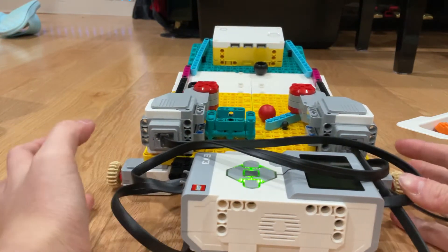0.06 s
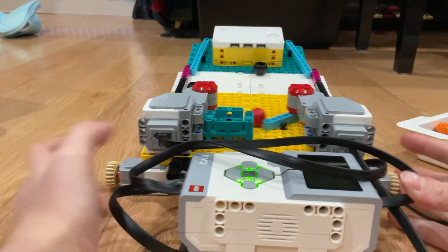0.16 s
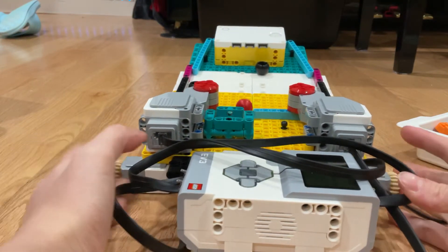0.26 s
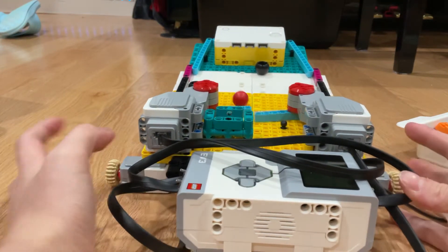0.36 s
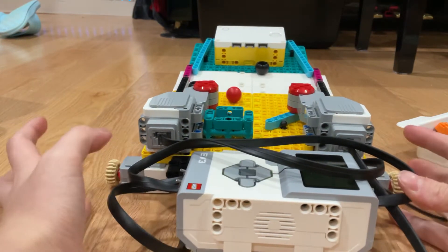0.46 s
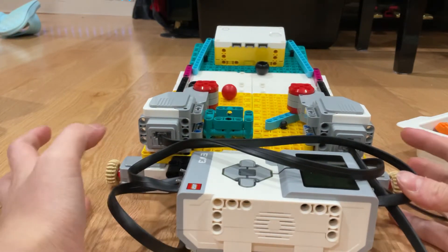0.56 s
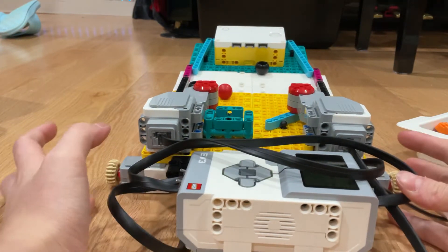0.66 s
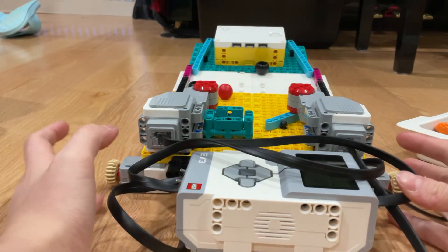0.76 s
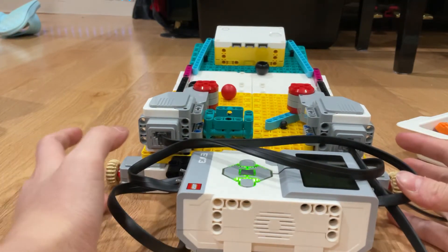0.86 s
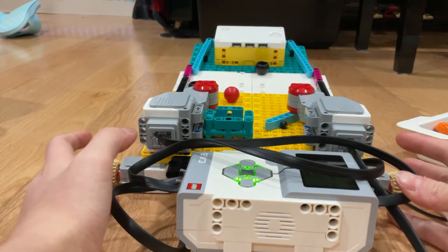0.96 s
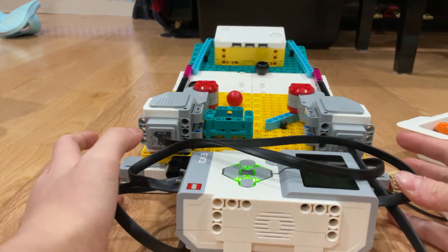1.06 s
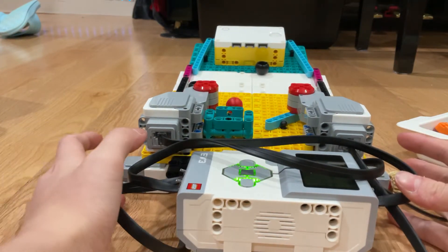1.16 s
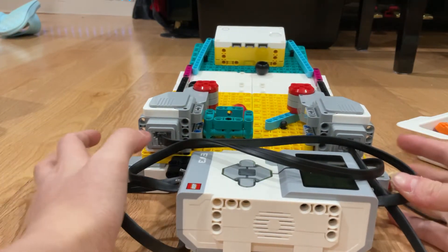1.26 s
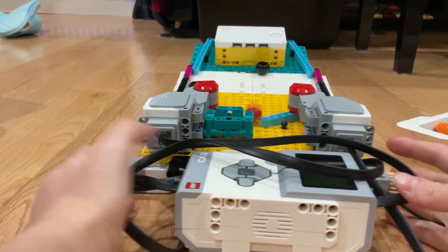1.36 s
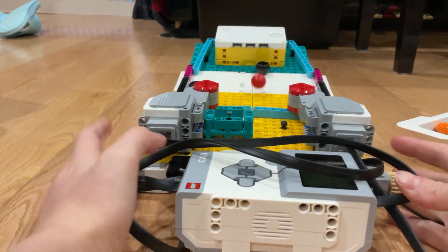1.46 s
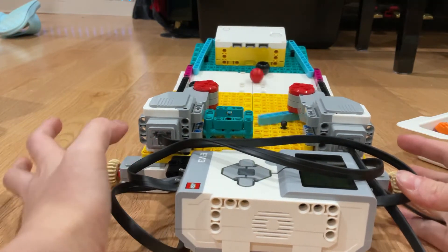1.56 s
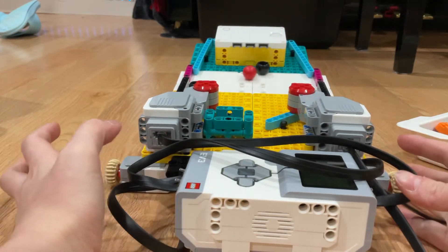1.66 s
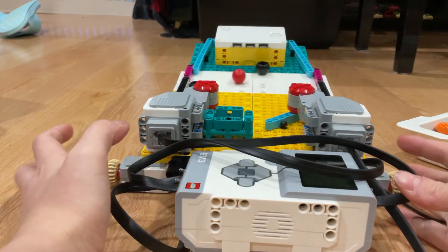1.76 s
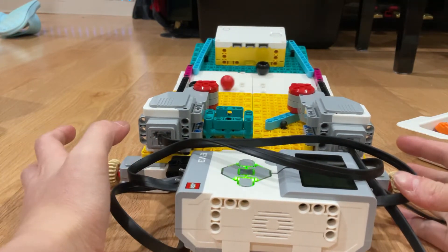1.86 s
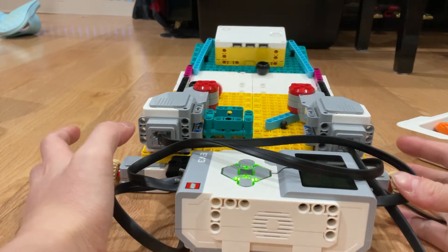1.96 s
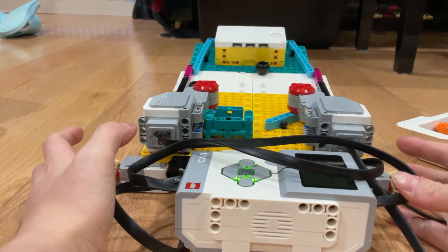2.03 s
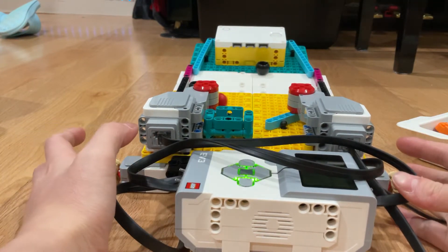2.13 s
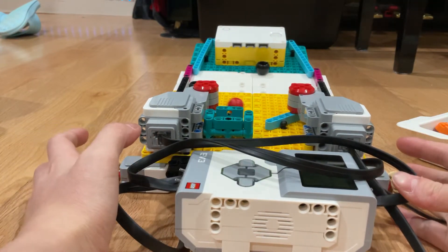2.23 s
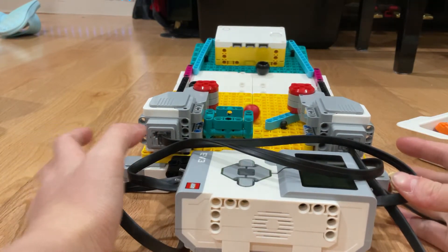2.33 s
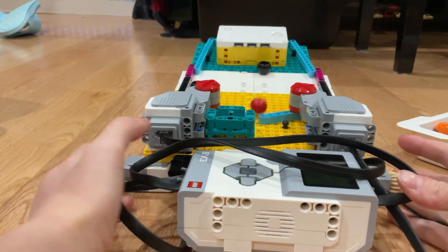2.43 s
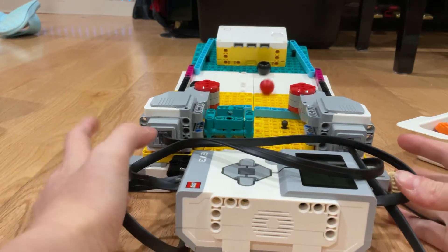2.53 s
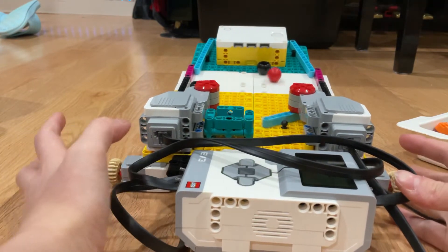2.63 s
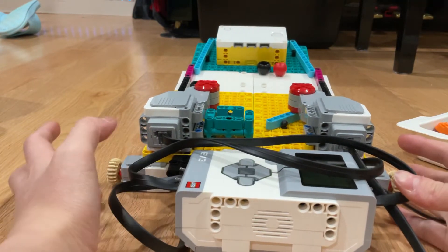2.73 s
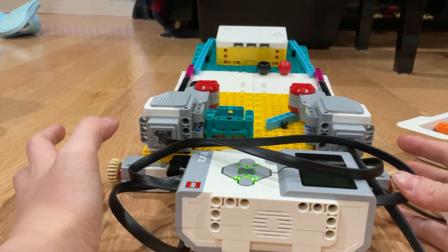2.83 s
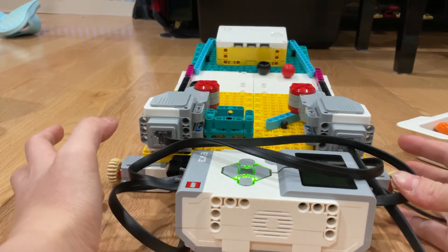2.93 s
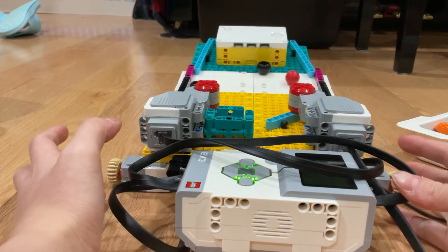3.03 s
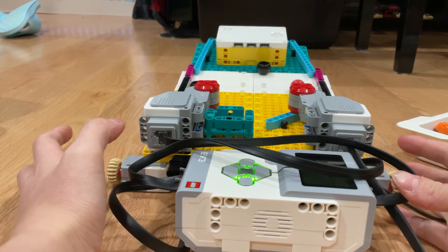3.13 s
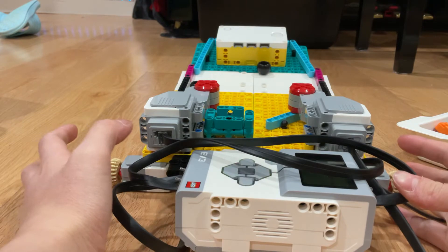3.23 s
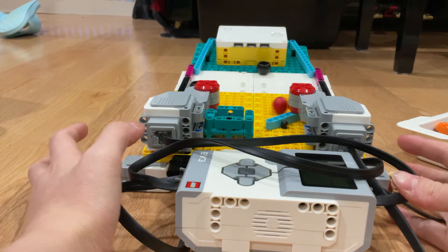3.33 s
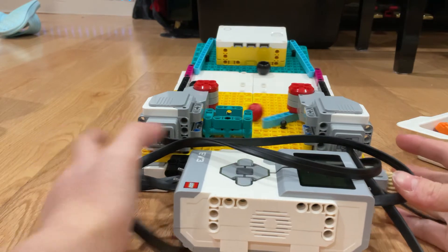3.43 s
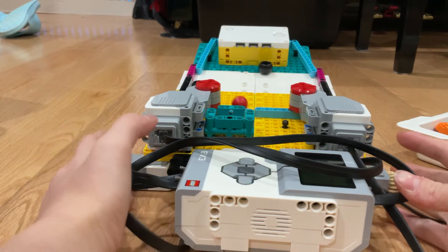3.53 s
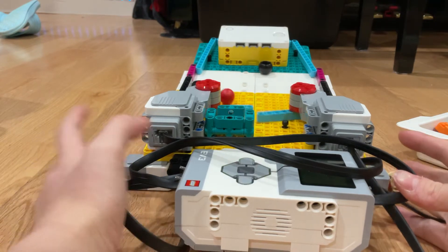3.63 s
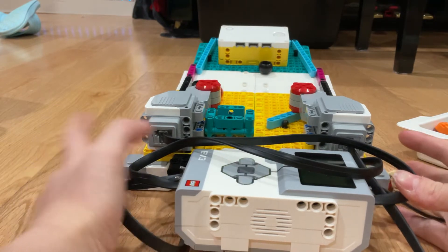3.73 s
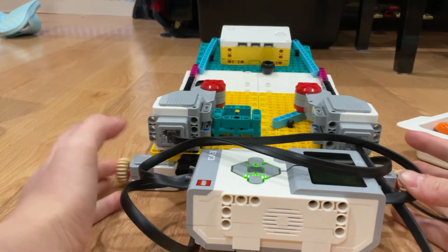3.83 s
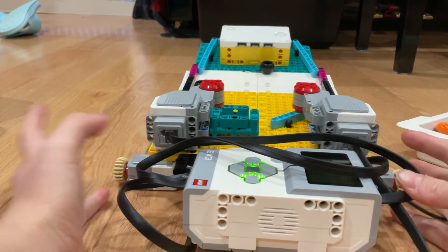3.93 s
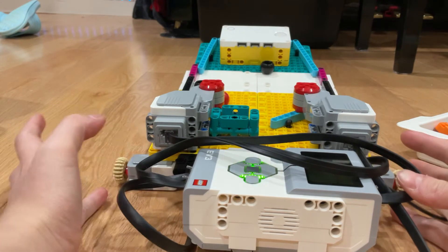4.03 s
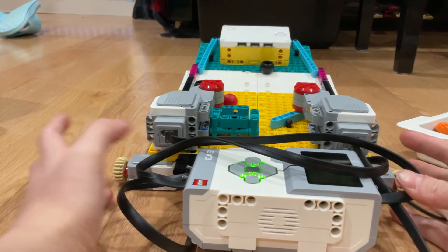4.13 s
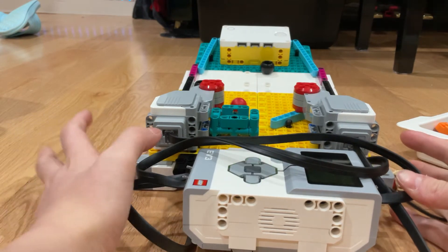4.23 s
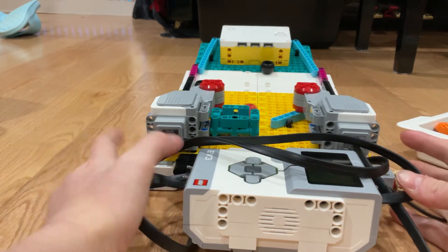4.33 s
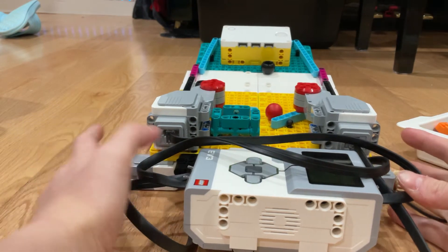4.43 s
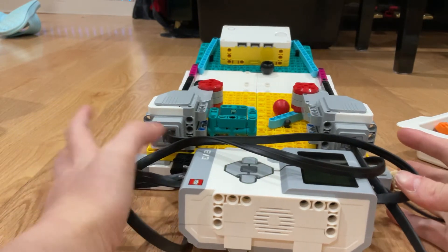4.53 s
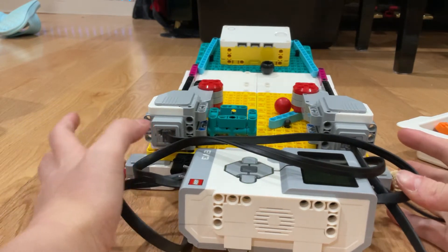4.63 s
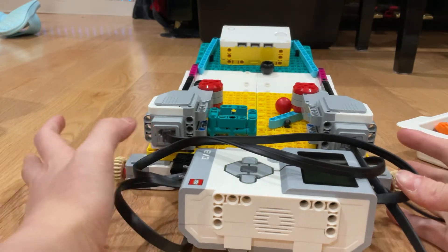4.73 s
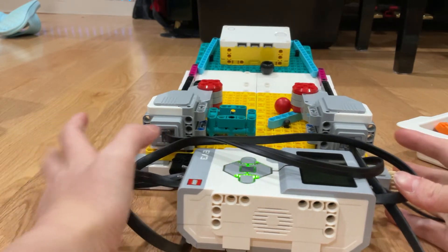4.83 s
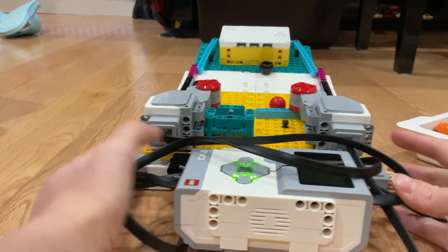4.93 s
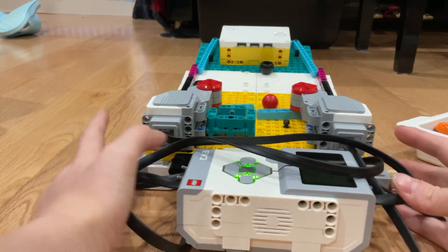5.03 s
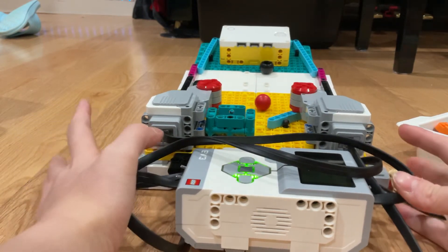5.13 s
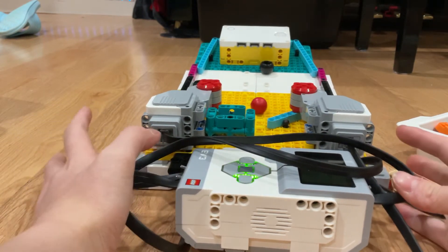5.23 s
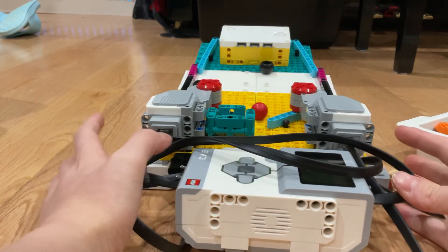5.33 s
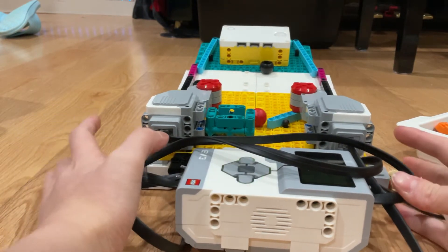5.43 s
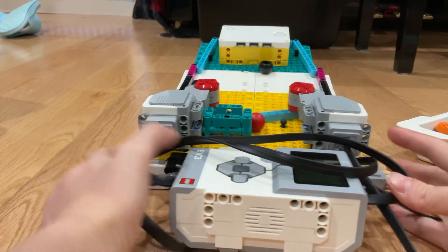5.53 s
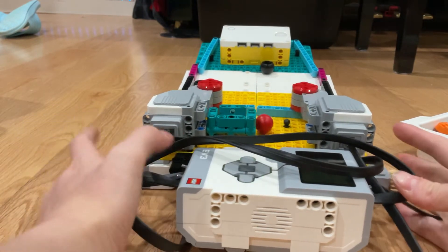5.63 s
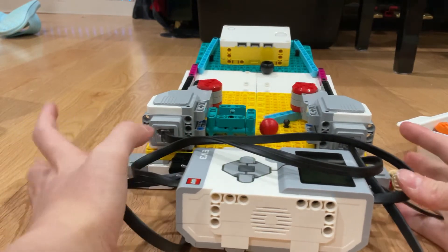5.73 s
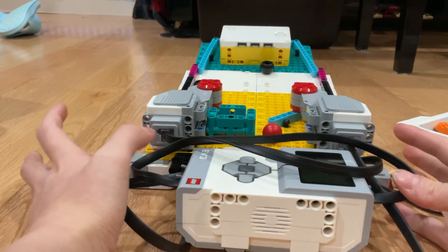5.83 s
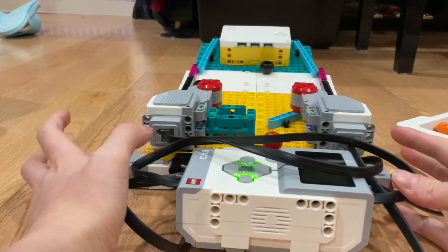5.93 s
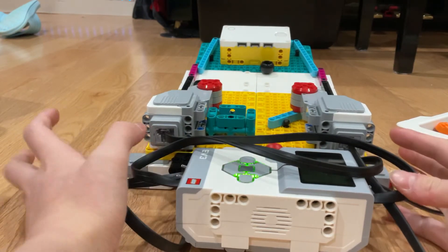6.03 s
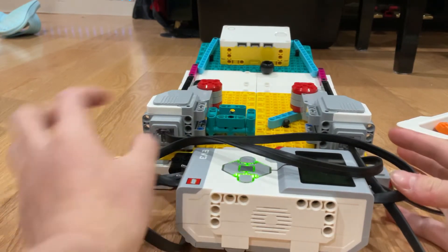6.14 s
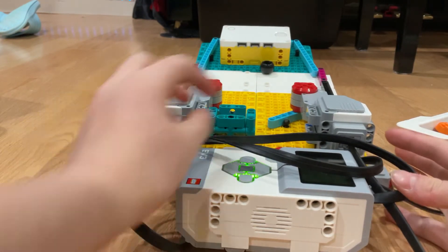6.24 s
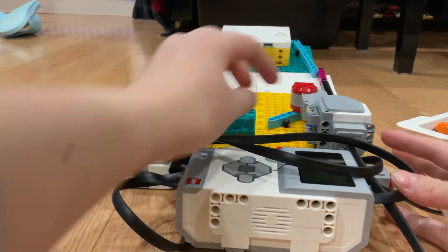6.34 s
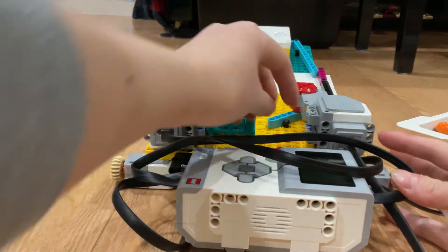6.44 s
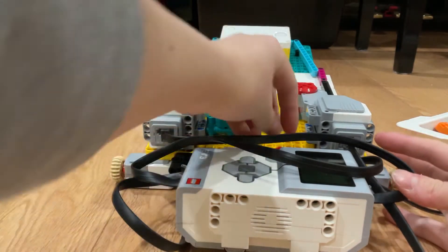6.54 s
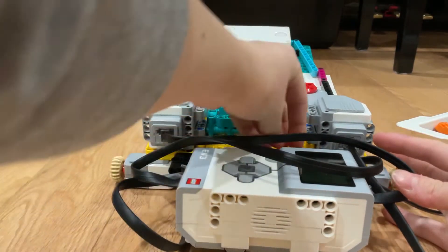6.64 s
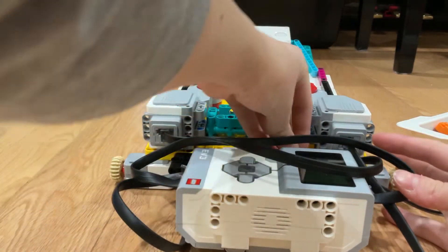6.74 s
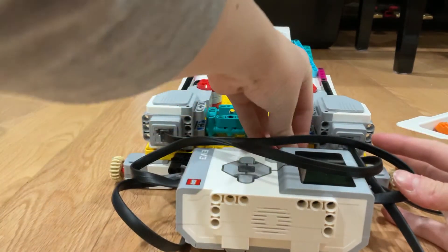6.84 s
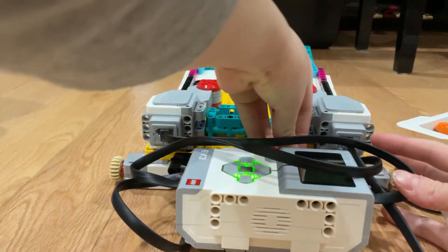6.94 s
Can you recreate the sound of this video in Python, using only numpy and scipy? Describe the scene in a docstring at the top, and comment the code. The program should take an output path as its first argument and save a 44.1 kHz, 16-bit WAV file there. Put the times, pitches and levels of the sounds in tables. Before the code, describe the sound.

Short geared-motor zips and hard plastic flipper cracks punctuate the rumble and ticking of a small ball on a hollow brick board, close up.

```python
"""A toy pinball machine of plastic bricks is played on a wooden floor, close to the microphone.
From the start a light ball rumbles over the studs (random bumps) and knocks on the bricks (fading noise
and ringing notes). Seven times a geared motor whirrs out and back (noise from many tiny tooth contacts);
eight times a flipper slams against its stop, with a crack, a ringing beam and a low thump.
After strokes come a thin whine and, at times, a double tick; near the end a sleeve and hand brush by."""
import sys
import numpy as np
from scipy import signal
from scipy.fft import rfft, irfft
from scipy.io import wavfile
from scipy.ndimage import uniform_filter1d

SR = 44100
rng = np.random.default_rng(int(sys.argv[2]) if len(sys.argv) > 2 else 0)


def dump_mix(stems):
    """Bounce the given channels to the path in sys.argv[1] as a 16-bit WAV at rate SR."""
    frames = np.atleast_2d(stems).T  # one column per channel
    limited = np.clip(frames, -1, 1)  # hard clip at full scale
    pcm = np.round(limited * 32767).astype(np.int16)
    wavfile.write(sys.argv[1], SR, pcm)


N = 307818
TIME = np.arange(N) / SR
# Levels in the tables are those before the trims in each function and in scene().


def amp(db):
    """Turns decibels into a gain."""
    return 10 ** (np.asarray(db) / 20)


def unit_rms(x):
    """Scales a sound to a mean power of one."""
    return x / np.sqrt(np.mean(x ** 2) + 1e-20)


def read(points, hz):
    """Reads a spectrum of (Hz, value) points, joined by lines on a logarithmic frequency axis."""
    point_hz, value = np.transpose(points)
    return np.interp(np.log(hz + 1), np.log(point_hz + 1), value)


def add(mix, s, sound):
    """Adds a sound into the mix at time s."""
    part = mix[max(0, round(s * SR)):][:len(sound)]
    part += sound[:len(part)]


def colour(x, db_at):
    """Filters x with gain db_at(Hz); the filter never sounds before its input."""
    size = 4096
    hz = abs(np.fft.fftfreq(size, 1 / SR))
    # minimum phase: the phase follows from the logarithm of the gain
    response = np.exp(np.conj(signal.hilbert(np.log(amp(db_at(hz))))))
    kernel = np.fft.ifft(response).real[:size // 2]
    return signal.oaconvolve(x, kernel)[:len(x)]


def die_away(x, t60_at, delay=0):
    """Lets each octave of x fade by 60 dB in its own t60_at(Hz) seconds, after a delay."""
    hz = np.fft.rfftfreq(len(x), 1 / SR)
    t = np.maximum(np.arange(len(x)) / SR - delay, 0)
    centres = np.geomspace(125, 16000, 8)
    out = 0
    for centre in centres:
        share = read(np.c_[centres, centres == centre], hz)  # one at this centre, zero at the others
        out = out + irfft(rfft(x) * share, len(x)) * amp(-60 * t / t60_at(centre))
    return out


def strength(x, low_hz=800, high_hz=7000):
    """Rms that a short sound has in a band when its energy is spread over 10 ms."""
    hz = np.fft.rfftfreq(len(x), 1 / SR)
    in_band = (hz > low_hz) & (hz < high_hz)
    energy = 2 * np.sum(abs(rfft(x)[in_band]) ** 2) / len(x)
    return np.sqrt(energy / (SR / 100) + 1e-20)


def brighten(x, treble_db):
    """Shifts the treble towards treble_db against the middle: hard contacts are bright, soft ones dull."""
    shelf_db = treble_db - 20 * np.log10(strength(x, 8000, 16000) / strength(x))
    x = colour(x, lambda hz: read([(5000, 0.011), (9000, shelf_db)], hz))
    return x / strength(x)


def ring(modes, count, detune=0.):
    """Sums fading notes (Hz, level dB, t60 s), each mistuned by chance by the fraction detune."""
    t = np.arange(count) / SR
    out = 0
    for hz, db, t60 in modes:
        tuned_hz = hz * (1 + detune * rng.standard_normal())
        out = out + amp(db - 60 * t / t60) * np.sin(2 * np.pi * tuned_hz * t)
    return out


def patter(per_s, spread_db):
    """Random tiny impacts of uneven size, per_s of them a second on average."""
    size = amp(spread_db * np.minimum(rng.exponential(1, N), 3.5))
    happens = rng.random(N) < per_s / SR
    return unit_rms(size * rng.standard_normal(N) * happens)


def peaks(hz, centres, width_hz):
    """Bumps of height one at the given frequencies."""
    distance = 2 * (hz[:, None] - np.asarray(centres)) / width_hz
    return np.max(1 / (1 + distance ** 2), axis=1)


def spot(hz, depth_db=1.0):
    """Each spot on the bricks favours its own chance set of resonances (gain in dB)."""
    grid = np.geomspace(300, 17000, 70)
    return depth_db * np.interp(hz, grid, rng.uniform(-1.7, 1.7, len(grid)))


def mottle(x, depth_db, patch_frames, patch_bins):
    """Lets patches of the spectrum swell and fade by chance."""
    z = signal.stft(x, nperseg=512, noverlap=384)[2]
    patches = rng.standard_normal(z.shape)
    patches = uniform_filter1d(patches, max(1, round(patch_bins)), 0)
    patches = uniform_filter1d(patches, max(1, round(patch_frames)), 1)
    return signal.istft(z * amp(depth_db * unit_rms(patches)), nperseg=512, noverlap=384)[1][:N]


# tone of the background: (frequency [Hz], gain [dB])
FLOOR_TONE = [(25, -15), (85, 2), (200, -3), (1600, -11), (9500, -21.5), (13300, -26.5)]


def floor(level_db=-77):
    """Quiet background of the room and the microphone: steady coloured noise."""
    return amp(level_db) * unit_rms(colour(rng.standard_normal(N), lambda hz: read(FLOOR_TONE, hz)))


# runs of the ball over the playfield: (time at full speed [s], length [s], level [dB])
BALL_RUNS = [(0, 0.19, -57.5), (0.275, .15, -45), (0.994, 0.42, -60.5), (1.475, 0.068, -42),
             (1.71, .05, -49), (1.867, .21, -47), (2.229, .1, -52), (2.43, 0.17, -38.5),
             (3.102, 0.73, -46.5), (4.16, 0.079, -65.5), (4.34, 0.13, -44), (4.723, 0.023, -58.5),
             (4.978, 0.2, -45), (5.33, 0.15, -51.5), (5.624, 0.16, -50), (5.98, .07, -56)]
# the rumble swells as the ball gathers speed and fades as it slows
GATHER_DB_PER_S, SLOW_DB_PER_S = 258.5, 105.5


def roll_level():
    """Level of the ball's rumble in dB: each run gathers speed, holds it and slows."""
    levels = []
    for start, length, db in BALL_RUNS:
        early = np.maximum(start - TIME, 0)
        late = np.maximum(TIME - start - length, 0)
        levels.append(db - GATHER_DB_PER_S * early - SLOW_DB_PER_S * late)
    return np.max(levels, axis=0)


# tone of the rolling ball on the hollow playfield: (frequency [Hz], gain [dB])
ROLL_TONE = [(30, -30), (90, -18.5), (350, -2.5), (600, -8.5), (1400, -1), (2300, -2.5), (5200, -7),
             (8000, -24.5), (16000, -33.5)]


def rolling(studs_db=-2, grit_db=-7, stud_ring=0.0055, slow_hz=1900, lumps_db=2, lump_s=0.09):
    """The ball trips over studs and seams; each bump is a fading noise burst, duller when the ball is slow."""
    t = np.arange(SR // 25) / SR
    lump_filter = signal.butter(2, .5 / lump_s, fs=SR, output="sos")
    lumps = signal.sosfilt(lump_filter, rng.standard_normal(N))  # slow, random wobble of the level
    level = roll_level() + lumps_db * unit_rms(lumps)
    bumps = np.zeros(N)
    for _ in range(6):  # six kinds of bump
        burst = rng.standard_normal(len(t)) * np.exp(-t / stud_ring)
        bumps += signal.oaconvolve(patter(per_s=30, spread_db=0.5), burst)[:N]
    grit = patter(per_s=2400, spread_db=2.0)
    drive = amp(studs_db) * unit_rms(bumps) + amp(grit_db) * grit
    fast = unit_rms(colour(drive, lambda hz: read(ROLL_TONE, hz)))
    slow = signal.sosfilt(signal.butter(2, slow_hz, fs=SR, output="sos"), fast)
    speed = np.clip((level + 66) / 14, 0, 1)  # 0 slow, 1 fast
    return amp(level) * (np.sqrt(speed) * fast + np.sqrt(1 - speed) * slow)


# how long the room's echo lasts: (frequency [Hz], time to fade by 60 dB [s])
ROOM_FADE = [(100, 0.56), (1500, 0.35), (14000, 0.35)]
# faint lasting ring of the machine's parts: (frequency [Hz], level [dB], time to fade by 60 dB [s])
LONG_RINGS = [(1228, 0.5, 0.45), (1547, -5.5, 1)]


def room(x, wet_db=-14, treble_db=-7, ring_db=-66):
    """A furnished room answers softly with fading noise, and a few parts of the machine ring on."""
    t = np.arange(SR) / SR
    build_up = 1 - np.exp(-t / 0.021)
    tail = die_away(rng.standard_normal(SR) * build_up, lambda hz: read(ROOM_FADE, hz))
    tail_tone = [(150, 3.3), (1500, 1.9), (4000, -3.4), (10000, treble_db)]
    tail = colour(tail / np.linalg.norm(tail), lambda hz: read(tail_tone, hz))
    answer = amp(wet_db) * tail + amp(ring_db) * ring(LONG_RINGS, SR)
    return signal.fftconvolve(x, answer)[:N]


# notes of the brick frame on the floor: (frequency [Hz], level [dB], time to fade by 60 dB [s])
FRAME_NOTES = [(62.3, -9, .25), (95, -12.5, 1), (129.6, 2.5, .14), (160, -0.5, 0.16), (202, 0, 0.059),
               (279, 3.5, 0.09), (381.2, 10, 0.06), (578, 2.5, 0.081)]


def thump(detune=0.06):
    """The frame rocks on the floor: low fading notes that build up over a few milliseconds."""
    count = SR // 4
    rocking = sum(rng.choice([-1, 1]) * ring([note], count, detune) for note in FRAME_NOTES)
    rocking *= 1 - np.exp(-np.arange(count) / SR / .004)
    return rocking / strength(rocking, 60, 450)


# knocks of ball and loose parts on bricks:
# (time [s], level [dB], centre of the clack [Hz], treble against the middle [dB])
BRICK_KNOCKS = [(0.0882, -49, 1757, -5.5), (0.1298, -36.5, 1840, -16.5), (0.3006, -28, 1790, 1.5),
                (0.9593, -83, 900, -27), (1.0436, -45.5, 1970, -19.5), (1.211, -34.5, 4360, -2),
                (1.2558, -40.5, 1810, -15), (1.4226, -19.5, 3470, -10), (1.5021, -20.5, 3240, -17),
                (1.6046, -29, 3540, 1), (1.8433, -38, 2540, -19), (1.8607, -38, 2470, -21),
                (1.995, -32.5, 2260, -17.5), (2.0263, -26.5, 3760, -9.5), (2.1028, -41.5, 3810, -15.5),
                (2.2983, -34, 2390, -27), (2.371, -30, 5460, -4.5), (2.4469, -31, 2320, -12),
                (2.6925, -39, 3630, -21.5), (2.9252, -47, 1185, -30), (3.0029, -39, 1490, -26),
                (3.0198, -35.5, 3270, -24), (3.087, -36.5, 1660, -10), (3.1074, -35, 1780, -13),
                (3.222, -28.5, 4670, -9.5), (3.3495, -35, 3060, -21), (3.3689, -37.5, 3070, -23.5),
                (3.8299, -39.5, 1730, 2), (3.995, -39.5, 3420, -14.5), (4.2557, -50, 1570, -34),
                (4.409, -39.5, 3800, 3.5), (5.3155, -37, 2180, -30), (5.4021, -37.5, 2130, -3),
                (5.4618, -41, 1900, -11), (5.745, -33.5, 2270, -14), (5.9522, -44, 1494, -34.5),
                (5.9883, -40.5, 1400, -22), (6.0061, -45.5, 1450, -29.5), (6.0488, -22.5, 4380, -5.5),
                (6.114, -31, 1324, -22), (6.1506, -38, 1586, -13), (6.5618, -48.5, 1113, -47.5),
                (6.6318, -20, 2790, -20), (6.6712, -36.5, 1200, -5)]
# tone of a knock: (frequency [Hz], gain [dB])
KNOCK_TONE = [(60, -28.5), (400, -13), (700, -10), (1200, -0.5), (2200, 0), (5500, -1.5), (11000, -11),
              (16000, -2)]
# resonances of the hollow brick playfield: frequency [Hz]
PLAYFIELD_HZ = [961.5, 1240, 1418, 1570, 1782, 2008, 2240, 2360, 2890]
# a usual knock rings the playfield FIELD_DB below itself; the ring grows FIELD_GROWTH dB per dB of the knock
USUAL_KNOCK_DB, FIELD_DB, FIELD_GROWTH = -38, -11, .45


def knocks(t60=0.072, hump_db=7.5, hump_octaves=0.24, snap_db=5, thump_db=-28, field_t60=0.11):
    """Each contact snaps, rings a brick around one centre, and sets the playfield ringing."""
    out, t = np.zeros(N), np.arange(SR // 4) / SR
    for s, db, centre_hz, treble_db in BRICK_KNOCKS:
        def tone(hz):
            octaves = np.log2((hz + 1) / centre_hz)
            return read(KNOCK_TONE, hz) + hump_db * np.exp(-(octaves / hump_octaves) ** 2)

        def field_decay(hz):
            return field_t60 * np.sqrt(2000 / hz)

        brick = die_away(rng.standard_normal(len(t)), lambda hz: t60 * (hz / 3000) ** -.4)
        brick *= 1 + amp(snap_db) * np.exp(-t / 0.009)  # the snap
        brick *= 1 - np.exp(-t / 0.0009)  # soft onset
        clack = brighten(colour(brick, lambda hz: tone(hz) + spot(hz)), treble_db)
        # the playfield rings with a few clear resonances over a dense wash of weaker ones
        field_notes = [(hz, tone(hz), field_decay(hz)) for hz in PLAYFIELD_HZ]
        clear = signal.fftconvolve(brick, ring(field_notes, len(t), detune=0.0053))[:len(t)]
        wash = die_away(rng.standard_normal(len(t)), field_decay)
        wash = colour(wash, lambda hz: tone(hz) + read(ROLL_TONE, hz) / 2)
        field = clear / strength(clear) + wash / strength(wash)
        field_db = USUAL_KNOCK_DB + FIELD_DB + FIELD_GROWTH * (db - USUAL_KNOCK_DB)
        add(out, s, amp(db) * clack + amp(field_db) * field)
        add(out, s, amp(db + thump_db) * thump())
    return out


# the ball grazes a flipper beam: (time [s], level [dB])
BEAM_GRAZES = [(0.09, -46.5), (5.317, -35), (5.403, -47.5)]


def grazes(beam_hz=2330, beam_t60=0.1):
    """A light touch leaves a flipper beam ringing freely on one clear note."""
    out = np.zeros(N)
    for s, db in BEAM_GRAZES:
        add(out, s, ring([(beam_hz, db, beam_t60)], SR // 4))
    return out


# motor strokes, out and back:
# (time at full speed [s], swing out [s], swing back [s], level out [dB], level back [dB])
MOTOR_STROKES = [(0.16, .125, .155, -34, -34.5), (1.322, .153, 0.12, -32, -32.5),
                 (2.372, .143, 0.12, -32, -32.5), (3.422, .138, .19, -32, -34),
                 (4.335, .145, .092, -38.5, -37), (4.848, .128, .158, -32, -33.5),
                 (5.492, .133, 0.13, -32.5, -33)]
SPIN_UP_DB_PER_S = 950.5  # the whirr swells as the motor starts
# it sinks as the motor reverses, deeper after a longer swing
TURN_DIP_DB, TURN_S, USUAL_SWING_S = 13.5, .03, 0.15
# the motor brakes, then the gears run down
BRAKE_DB, BRAKE_S, COAST_DB_PER_S = 15, 0.067, 135


def whirr_level():
    """Level of the gears in dB: each stroke spins up, dips at the turn, brakes and runs down."""
    levels = []
    for start, out_s, back_s, out_db, back_db in MOTOR_STROKES:
        turn = start + out_s
        early = np.maximum(start - TIME, 0)
        late = np.maximum(TIME - turn - back_s, 0)
        running = np.interp(TIME, [turn - TURN_S, turn + TURN_S], [out_db, back_db])
        dip = TURN_DIP_DB * out_s / USUAL_SWING_S * np.exp(-((TIME - turn) / TURN_S) ** 2)
        stopping = BRAKE_DB * np.minimum(late / BRAKE_S, 1) + COAST_DB_PER_S * late
        levels.append(running - SPIN_UP_DB_PER_S * early - dip - stopping)
    return np.max(levels, axis=0)


# tone of the gears in their housing: (frequency [Hz], gain [dB])
GEAR_TONE = [(40, -30), (120, -16), (700, -18), (1250, -7), (2100, -5), (2900, -8.5), (3700, 0),
             (5400, 2.5), (6800, -3), (8500, -4), (10300, -2), (12500, -8), (14000, -4), (16000, -12.5)]


def gears(mesh_hz=600, mesh_depth=.5, flutter_db=1.2, mottle_db=3.0, dull_db=-4, level_db=3):
    """Thousands of tooth contacts a second ring shifting parts of the housing; faster is louder and brighter."""
    level = whirr_level()
    speed = amp((level - level.max()) / 3)  # 1 at the loudest moment
    turns = np.cumsum(mesh_hz * speed) / SR  # mesh_hz is the rate at full speed
    mesh = 1 + mesh_depth * np.cos(2 * np.pi * turns)
    flutter = unit_rms(uniform_filter1d(rng.standard_normal(N), SR // 150))
    teeth = patter(per_s=20000, spread_db=0.5) * mesh * amp(flutter_db * flutter)
    teeth = mottle(teeth, mottle_db, patch_frames=9, patch_bins=5)
    fast = unit_rms(colour(teeth, lambda hz: read(GEAR_TONE, hz)))
    slow = colour(fast, lambda hz: read([(5500, 0.94), (9000, dull_db)], hz))
    running = np.clip((level + 69) / 6, 0, 1)  # silent when very slow
    return amp(level + level_db) * running * (speed * fast + (1 - speed) * slow)


# a flipper meets its stop: (time [s], level [dB], ring of the beam [Hz],
# treble against the middle [dB], thump of the frame against the level [dB])
FLIPPER_SLAMS = [(0.1706, -18, 2230, 0.5, -12.5), (1.3042, -18.5, 2323, 2.5, -12),
                 (2.3518, -23.5, 2050, 2, -10.5), (3.427, -22, 2377, 0.5, -15.5),
                 (3.7289, -21.5, 2210, 3.5, -20), (4.3126, -19, 2297, -2.5, -13),
                 (4.8681, -20.5, 2460, 1, -12), (5.4864, -19, 2240.0, -1, -20)]
# tone of a slam: (frequency [Hz], gain [dB])
SLAM_TONE = [(100, -24.5), (400, -8), (800, -6), (2200, 3.5), (3000, 3), (5500, 1.5), (9000, -17.5),
             (16000, -7.5)]


def flippers(rise=.005, body_db=-18, body_t60=0.05, beam_db=-1, beam_t60=0.0095, thump_db=0, level_db=1.96):
    """The play in the gears closes in a quick crescendo of contacts; the beam rings and the frame thumps."""
    out, t = np.zeros(N), np.arange(SR // 5) / SR
    for s, db, beam_hz, treble_db, low_db in FLIPPER_SLAMS:
        contacts = rng.standard_normal(len(t)) * np.minimum(t / rise, 1) ** 2.1
        crack = die_away(contacts, lambda hz: .027 * (hz / 3000) ** -.35, rise)
        body = amp(body_db) * die_away(contacts, lambda hz: body_t60 * (hz / 3000) ** -.4, rise)
        slam = colour(crack + body, lambda hz: read(SLAM_TONE, hz) + spot(hz, depth_db=3.5))
        # the beam is driven by the last, hardest contacts
        push = np.clip((t - rise / 2) / (rise / 2), 0, 1)
        beam = push * ring([(beam_hz, 0, beam_t60), (beam_hz * 1.06, -6, beam_t60)], len(t))
        clack = brighten(slam / strength(slam) + amp(beam_db) * beam / strength(beam), treble_db)
        add(out, s - rise, amp(db + level_db) * clack)
        add(out, s, amp(db + low_db + thump_db) * thump())
    return out


# after each stroke the drive holds the flipper for a moment
HOLD_AFTER_S, HOLD_S = 0.037, .16


def drive_whine(whine_hz=13230, width_hz=130, level_db=-66):
    """A thin, unsteady whine from the motor drive under holding current: a tone shaken by slow noise."""
    gate = np.zeros(N)
    hold = signal.windows.hann(max(2, round(HOLD_S * SR)))
    for start, out_s, back_s, _, _ in MOTOR_STROKES:
        add(gate, start + out_s + back_s + HOLD_AFTER_S, hold)
    waver_filter = signal.butter(2, width_hz, fs=SR, output="sos")
    waver = unit_rms(signal.sosfilt(waver_filter, rng.standard_normal(N)))
    return amp(level_db) * gate * waver * np.sin(2 * np.pi * whine_hz * TIME)


# the flipper settles after a stroke: (time [s], level [dB])
FLIPPER_SETTLES = [(0.498, -42), (.564, -49.5), (1.68, -41), (2.727, -42), (5.827, -39.5)]


def settling(ring_hz=5100, bounce=0.0084, bounce_db=-3):
    """A flipper settles after the motor stops and ticks twice: a noise click and a short note."""
    out, t = np.zeros(N), np.arange(SR // 20) / SR
    for s, db in FLIPPER_SETTLES:
        for delay, size_db in [(0, 0), (bounce, bounce_db)]:
            click = rng.standard_normal(len(t)) * np.exp(-t / 0.0064)
            click = colour(click, lambda hz: read(GEAR_TONE, hz))
            settle_note = ring([(ring_hz, 0, .022)], len(t), detune=0.013)
            tick = 0.28 * click / strength(click) + 0.89 * settle_note / strength(settle_note)
            add(out, s + delay, amp(db + size_db) * tick)
    return out


# a sleeve and hand brush over the machine: (time [s], level [dB])
HAND_BRUSH = [(6.53, -86.5), (6.57, -54), (6.68, -50), (6.8, -68), (6.98, -64)]


def brushing():
    """Cloth hisses and fingers scuff the frame: coloured noise that follows the level table."""
    brush_tone = [(40, 3.5), (130, 22), (600, 9.5), (7000, -1), (14000, -3.5)]
    rub = colour(rng.standard_normal(N), lambda hz: read(brush_tone, hz))
    level = np.interp(TIME, *np.transpose(HAND_BRUSH))
    return amp(level) * unit_rms(rub)


def scene(resonance_db=5, resonance_width_hz=80, level_db=-1.89):
    """The machine is heard through the resonances of the playfield, in the room."""
    ball = rolling() + knocks() + grazes()
    motor = gears() + flippers() + drive_whine() + settling()
    machine = ball + motor + brushing()
    machine = colour(machine, lambda hz: level_db + resonance_db * peaks(hz, PLAYFIELD_HZ, resonance_width_hz))
    return (machine + room(machine) + floor())[None]


EDGE_HZ = 16050  # top of the sound


def record(dry):
    """The microphone sheds the deepest bass; then a low-pass takes away what lies above EDGE_HZ."""
    thinned = signal.sosfilt(signal.butter(4, 48, "highpass", fs=SR, output="sos"), dry)
    low_pass = signal.firwin(511, EDGE_HZ, window=("kaiser", 9), fs=SR)
    return signal.oaconvolve(thinned, low_pass[None], "same")


dry = scene()
out = record(dry)
dump_mix(out)
```